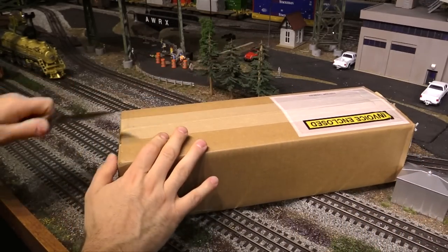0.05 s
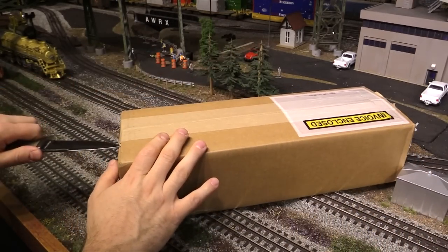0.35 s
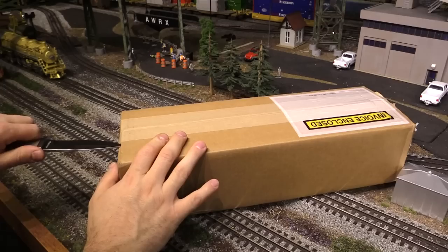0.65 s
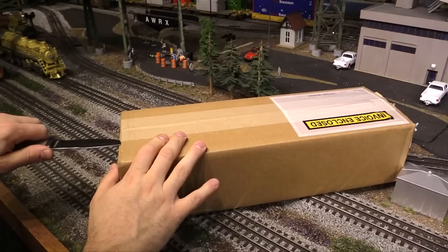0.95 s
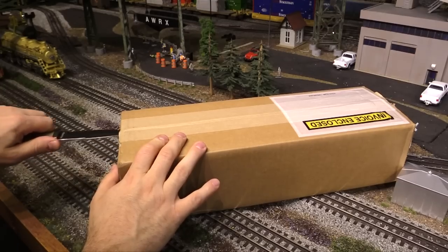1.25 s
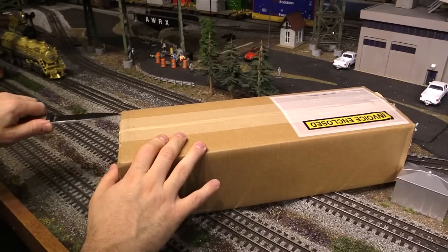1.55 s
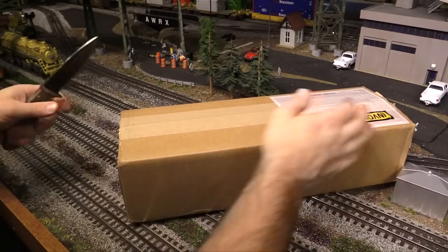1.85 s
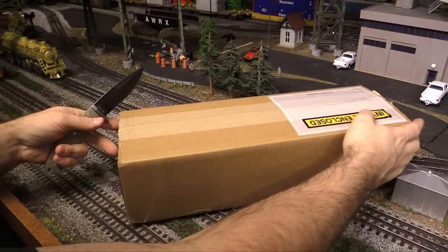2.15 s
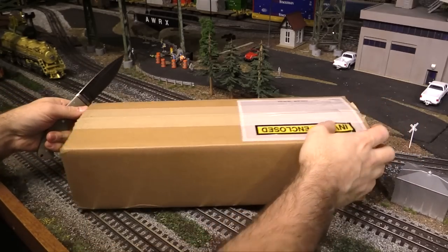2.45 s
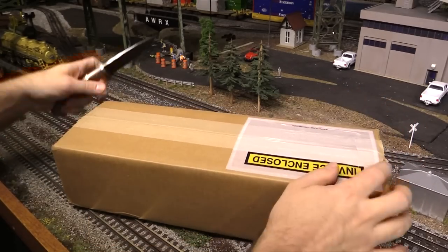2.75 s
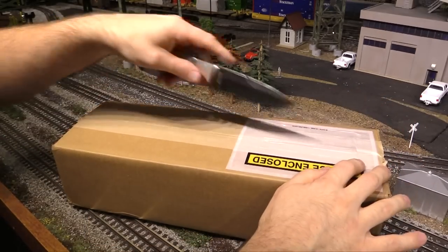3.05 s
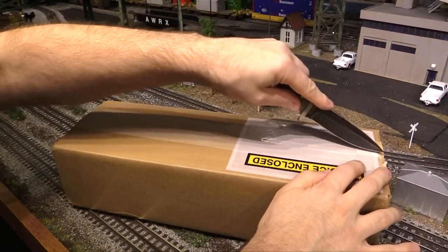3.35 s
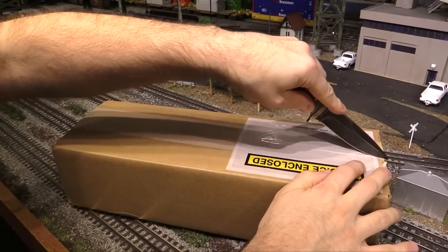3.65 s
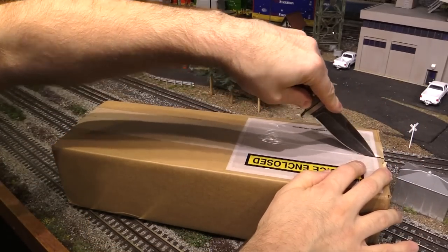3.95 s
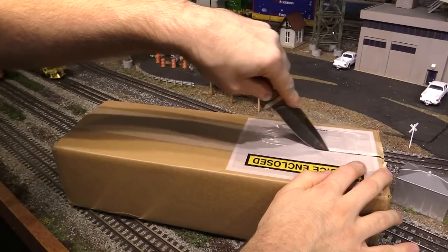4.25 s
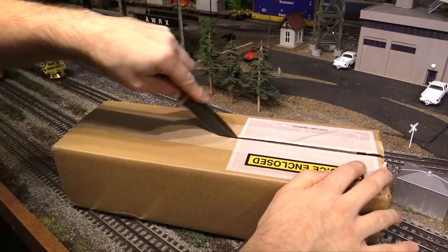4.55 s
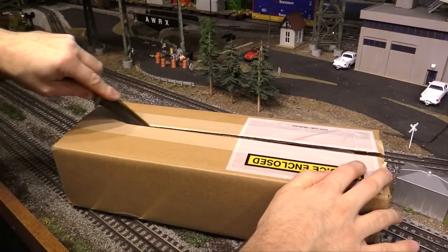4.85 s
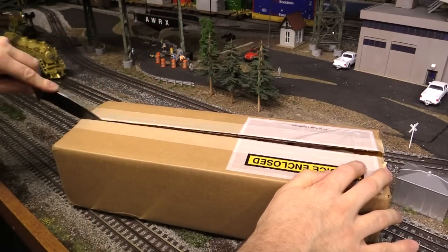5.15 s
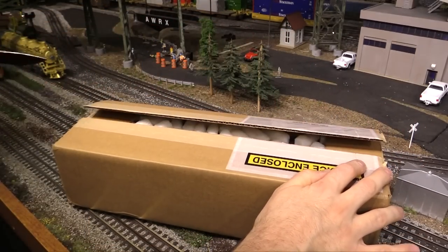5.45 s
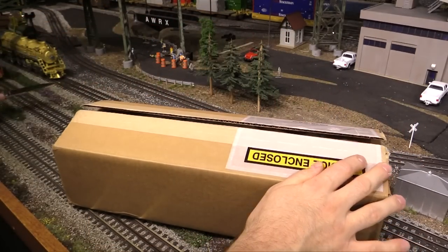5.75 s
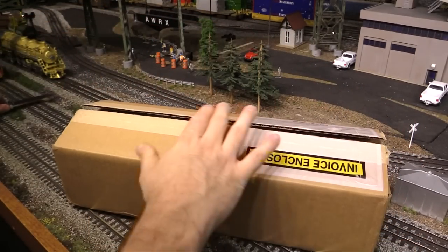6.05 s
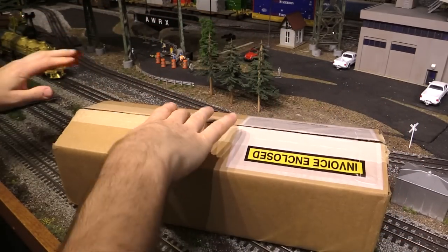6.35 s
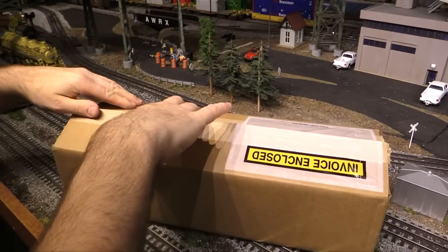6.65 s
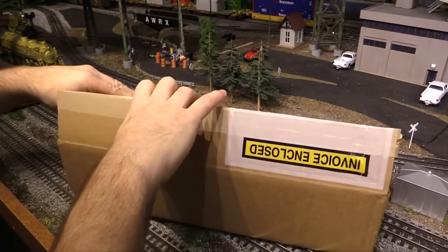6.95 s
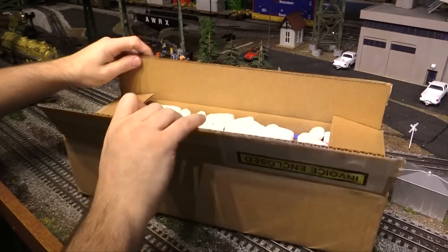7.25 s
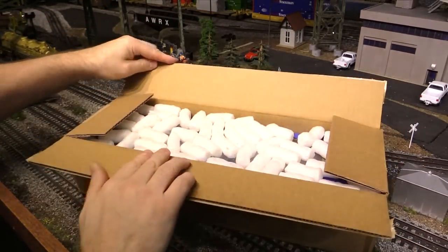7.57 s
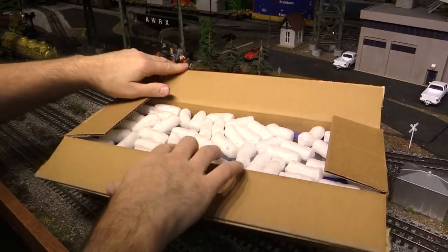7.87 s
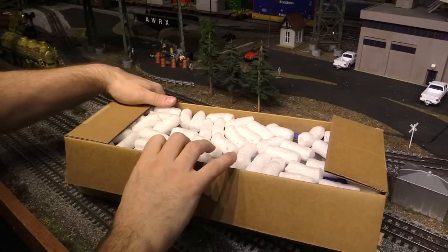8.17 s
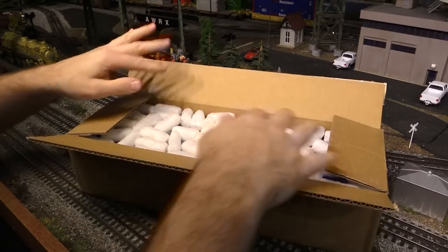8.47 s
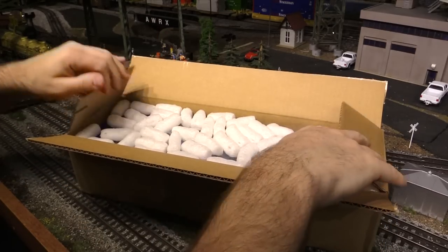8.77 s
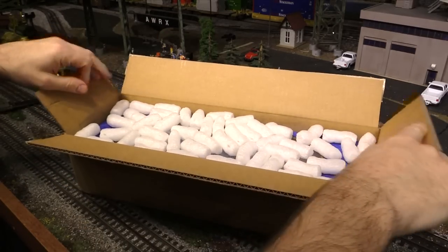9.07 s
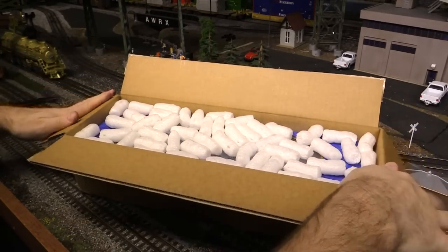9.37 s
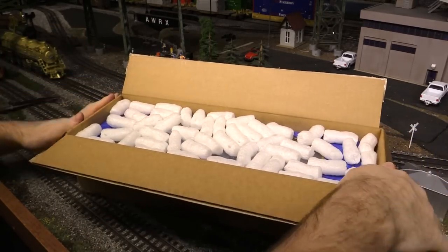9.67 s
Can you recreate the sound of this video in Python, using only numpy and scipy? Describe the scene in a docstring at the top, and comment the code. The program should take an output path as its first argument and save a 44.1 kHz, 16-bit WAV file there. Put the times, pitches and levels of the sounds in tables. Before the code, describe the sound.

Heard up close in a small room, a cardboard box thumps and a blade makes several quick cuts in its tape. After some shuffling and bumping on the table, the knife punctures the tape and drags along the seam with a surging rasp. A few sharp cardboard snaps follow, then uneven rubbing and tapping as the flaps are opened, with faint dry ticks from foam packing peanuts over a low hiss.

```python
"""A small room, close to a cardboard box: a knife slits the packing tape, first the end, then the seam.
Between the cuts the box is turned on a table; then the flaps snap, fold back and brush foam peanuts.
Each stroke is stick-slip friction: a stream of tiny slips that swells and fades with the speed and is
coloured by the hollow box. Blows excite the damped modes of its panels, which boom and ring.
Short reflections follow every sound, over a soft hiss."""
import sys
import numpy as np
from scipy import signal
from scipy.fft import rfft, irfft, next_fast_len
from scipy.io import wavfile
from scipy.ndimage import uniform_filter1d

SR = 44100
rng = np.random.default_rng(int(sys.argv[2]) if len(sys.argv) > 2 else 0)


def wav_record(signal):
    """Record a signal, one row per channel, as 16-bit PCM in the file named by sys.argv[1]."""
    frames = np.transpose(np.atleast_2d(signal))
    bounded = np.clip(frames, -1, 1)
    # unit amplitude maps onto the largest positive 16-bit level
    quanta = np.round(bounded * 32767).astype(np.int16)
    wavfile.write(sys.argv[1], SR, quanta)


N = 432929
HZ = np.fft.rfftfreq(8192, 1 / SR) + 1  # frequency grid of the filters
RING_S = np.arange(SR // 3) / SR  # time axis of one decay

# modes of the lid after a blow: freq_hz, level_db, t60_s
LID_MODES = [(460, -1.5, 0.13), (539.5, -3, 0.12), (571, 5.5, 0.054), (740, -4, 0.091), (785, -1.5, 0.05)]


def knife():
    """Stick-slip of a blade in tape: short sawing strokes at the end, then one long pull down the seam."""
    # short strokes: start_s, length_s, fastest_fraction, level_db, boom_re_level_db, hiss_re_level_db
    cuts = [(0.666, 0.35, 0.66, -36.5, 0, -13), (1.015, .17, 0.67, -28.5, 2.5, -10.5),
            (1.184, 0.12, 1, -29, -5.5, -4), (1.266, 0.2, 0.34, -25, 2, -10),
            (1.456, 0.15, 0.67, -26, -1.5, -5.5), (1.603, 0.076, 0.5, -30, -2, -11.5),
            (1.672, 0.115, 0.91, -41.5, 0.5, -7), (3.759, 0.15, 0.45, -41, -3, -13),
            (3.928, 0.2, 0.35, -32.5, -8, -11)]
    # the long pull, surging where the blade catches: time_s, force_db, boom_re_level_db, hiss_re_level_db
    seam = [(4.1, -41, -7, -11), (4.17, -35.5, 0, -9), (4.18, -28.5, -3, -15), (4.21, -31, 2, -10.5),
            (4.364, -21.5, -4.5, -14), (4.388, -14, -4.5, -11), (4.416, -20.5, -5.5, -12.5),
            (4.532, -28, -3, -11), (4.556, -23, -3, -13), (4.618, -19, -3, -10), (4.68, -22.5, -5, -7.5),
            (4.692, -17, -7, -11.5), (4.724, -24.5, -0.5, -9), (4.89, -17.5, -3, -11),
            (4.915, -16, -2, -10.5), (4.96, -20, -4.5, -13), (5.085, -28, -4, -6.5),
            (5.12, -20, -7.5, -10.5), (5.245, -31, 1, -7), (5.336, -40.5, -6, -5), (5.41, -58, -5, -7)]
    # friction spectra of the tape at the end and along the seam: freq_hz, density_db
    end_tape = [(50, -48), (145, -19), (185, -1.5), (400, -3), (600, -9), (740, -5), (1000, -8.5),
                (2900, -8.5), (3750, -16), (4100, -22), (5200, -25), (7200, -21), (12500, -32),
                (15500, -43)]
    seam_tape = [(50, -52), (100, -11.5), (146, -9), (178, -0.5), (290, 1.5), (480, -2), (680, -5),
                 (1100, -5), (2200, -3.5), (3700, -4.5), (4050, -13.5), (5400, -24), (6600, -18),
                 (12500, -29.5), (15500, -43)]
    out = np.zeros(N)
    for start, length, fastest, db, boom_db, hiss_db in cuts:
        level_db = stroke(length, fastest, db, db_per_decade=20)
        add(out, start, rub(level_db, boom_db, hiss_db, end_tape, slips_per_s=2500, spread_db=1.5,
                            scrape=0.61, grip_db=1.85, lid_share=0.73, boom_sway_db=-0.3, patchy_db=2.4))
    times, *controls = np.transpose(seam)
    pull_s = np.arange(times[0], times[-1], 1 / SR)
    force_db, boom_db, hiss_db = (np.interp(pull_s, times, control) for control in controls)
    add(out, times[0], rub(force_db + 1, boom_db, hiss_db, seam_tape, slips_per_s=1500, spread_db=0,
                           scrape=0.79, grip_db=1.24, lid_share=1.1, boom_sway_db=1, patchy_db=2.1))
    return amp(-2.5) * out


def flaps():
    """Friction at the folds: each flap scrapes as it swings, and brushes the foam."""
    # swings: start_s, length_s, fastest_fraction, level_db, boom_re_level_db, hiss_re_level_db
    folds = [(6.506, 0.17, 0.36, -49, 5, -29), (6.627, 0.33, 0.052, -45, -1, -11),
             (6.855, 0.17, 0.16, -39, -5, -9.5), (6.984, 0.22, 0.17, -37.5, 1, -11),
             (7.175, 0.2, 0.73, -34, -3.5, -7.5), (7.388, 0.16, 0.65, -36, -5, -7),
             (7.518, 0.17, 0.21, -32, -2.5, -10), (7.687, 0.12, 0.42, -34.5, -9, -13.5),
             (7.808, 0.23, 0.12, -46, -1, -10), (7.936, 0.3, 0.27, -38.5, -6.5, -10),
             (8.131, 0.14, 0.48, -39.5, -5, -19), (8.27, 0.1, 0.16, -40, 2, -14),
             (8.37, .15, 0.18, -38, -2, -9.5), (8.621, .15, 0.3, -38.5, -5.5, -14),
             (8.766, .16, 0.31, -40, -7, -14), (8.9, 0.16, 0.38, -36.5, -8.5, -6.5),
             (8.999, 0.22, 0.6, -35, -4, -11.5), (9.239, 0.036, 0.62, -29.5, -6, -7),
             (9.181, 0.21, 0.19, -31.5, -4, -7.5), (9.33, 0.25, 0.49, -33.5, -3, -13.5),
             (9.559, 0.068, 0.5, -33.5, 0, -30), (9.721, 0.19, 0.71, -29, -4, -16)]
    # friction spectrum of an open flap: freq_hz, density_db
    open_flap = [(29, -57), (50, -26), (165, -14), (288, -1), (413, -8), (466, -3.5), (668, -12.5),
                 (790, -10.5), (1410, -8), (2300, -11.5), (3200, -10), (3750, -15), (4100, -18.5),
                 (5260, -21.5), (5930, -14.5), (8710, -19.5), (12200, -24), (15500, -35)]
    out = np.zeros(N)
    for start, length, fastest, db, boom_db, hiss_db in folds:
        level_db = stroke(length, fastest, db, db_per_decade=15)
        add(out, start, rub(level_db, boom_db, hiss_db, open_flap, slips_per_s=450, spread_db=0.86,
                            scrape=1, grip_db=1.5, lid_share=0.18, boom_sway_db=2.7, patchy_db=2))
        add(out, start, peanuts(level_db - 21, ticks_per_s=60, spread_db=3))
    return amp(-2) * out


def sliding():
    """Sliding friction: a hand moves over the card, or the box turns on the table."""
    # slides: start_s, length_s, fastest_fraction, level_db, boom_re_level_db, hiss_re_level_db
    slides = [(0.033, 0.23, 0.078, -53, -27, 2.5), (2.168, 0.26, 0.8, -37, -4.5, -9.5),
              (2.382, 0.24, 0.64, -36.5, 4, -8), (2.561, 0.29, 0.36, -32.5, 5, -13.5),
              (2.777, 0.25, 0.41, -48, 6, -4.5), (3.031, 0.37, 0.09, -50, -7, -6.5),
              (3.53, .24, 0.83, -57, 1, -7), (5.362, 0.13, 0.34, -57, 15, -19),
              (5.68, 0.24, 0.85, -49.5, -2.5, -7.5)]
    # friction spectrum of cardboard: freq_hz, density_db
    cardboard = [(50, -38), (130, -25), (200, 2.5), (300, 2), (620, -5.5), (780, -2.5), (1180, -6),
                 (1900, -1.5), (3650, -6.5), (4050, -19), (5400, -28), (7500, -24.5), (12500, -35.5),
                 (15500, -46)]
    out = np.zeros(N)
    for start, length, fastest, db, boom_db, hiss_db in slides:
        level_db = stroke(length, fastest, db, db_per_decade=15)
        add(out, start, rub(level_db, boom_db, hiss_db, cardboard, slips_per_s=2500, spread_db=-0.5,
                            scrape=1, grip_db=3.5, lid_share=0.35, boom_sway_db=1, patchy_db=2))
    return amp(-3) * out


def stroke(length_s, fastest, db, db_per_decade):
    """Friction noise follows a power of speed: the level in dB of a movement that speeds up and slows."""
    progress = np.arange(0, length_s, 1 / SR) / length_s
    phase = np.interp(progress, [0, np.clip(fastest, 0.05, 0.95), 1], [0, 0.5, 1])
    speed = np.sin(np.pi * phase) + 0.036
    return db + db_per_decade * np.log10(speed)


def rub(level_db, boom_db, hiss_db, spectrum, slips_per_s, spread_db, scrape, grip_db, lid_share,
        boom_sway_db, patchy_db):
    """Source and filter: tiny slips over a smooth scrape drive the lid as the grip comes and goes."""
    size = len(level_db)
    slips = (rng.random(size) < slips_per_s / SR) * rng.choice([-1, 1], size)
    slips = slips * amp(spread_db * np.minimum(rng.exponential(1, size), 4))
    friction = evened(slips) + scrape * rng.standard_normal(size)
    grip = amp(grip_db * wander(size, rate_hz=64))
    sound = colour(friction * grip, read(spectrum, HZ) + lid_share * lid_resonance_db())
    sound = moving_contact(sound, patchy_db)
    # the boom of the panels, the rasp and the hiss of the edge, parted without phase shift
    boom_hz, hiss_hz = 650, 4300
    padded = next_fast_len(2 * size)
    bins, hz = rfft(sound, padded), np.fft.rfftfreq(padded, 1 / SR)
    boom = 1 / (1 + (hz / boom_hz) ** 6)
    hiss = 1 - 1 / (1 + (hz / hiss_hz) ** 12)
    rasp = 1 - boom - hiss
    parts = (boom, boom_db + boom_sway_db * wander(size, rate_hz=34)), (rasp, 0), (hiss, hiss_db)
    out = sum(evened(irfft(bins * share, padded)[:size]) * amp(level_db + db) for share, db in parts)
    return out * signal.windows.tukey(size, 0.0033 * SR / size)


def lid_resonance_db():
    """Forced resonance: the lid's gain on the HZ grid is a sum of bell-shaped peaks."""
    # resonances of the driven lid: centre_hz, width_hz, gain_db
    peaks = [(171, 11, 4.5), (217.5, 32, 4.5), (464, 40, 6), (801, 50, 8.5), (1107, 140, 7.5),
             (1370, 160, 5), (1880, 49, 6), (2180, 45, 1.5), (2410, 100, -0.5), (3140, 620, 2.5)]
    return sum(db / (1 + (2 * (HZ - hz) / width) ** 2) for hz, width, db in peaks)


def moving_contact(x, depth_db):
    """Excitation depends on position: as the contact travels, patches of resonance swell and fade."""
    spectra = signal.stft(x, nperseg=1024)[2]
    patches = uniform_filter1d(rng.standard_normal(spectra.shape), size=7, axis=0)  # across frequency
    patches = uniform_filter1d(patches, size=9, axis=1)  # across time
    return signal.istft(spectra * amp(depth_db * evened(patches)), nperseg=1024)[1][:len(x)]


def knocks():
    """Impact excitation: a struck panel cracks, swings a few times and leaves box and lid ringing."""
    # blows on the box: start_s, thump_db, thump_hz, lid_ring_db, crack_db, crack_hz
    blows = [(0.342, -18.5, 237, -22, -31.5, 745), (.423, -37, 228, -40, -61, 720),
             (1.564, -20, 230, -27, -19.5, 1950), (2.18, -45, 277, -41, -41, 1700),
             (2.245, -29.5, 483, -42, -34.5, 2020), (2.293, -28, 318, -31.5, -37, 1340),
             (2.608, -41, 293, -25.5, -32, 1558), (2.6989, -30, 296, -27, -23, 840),
             (2.793, -23.5, 182, -28.5, -34.5, 910), (2.823, -25.5, 197, -38, -56, 960),
             (3.005, -22.5, 182, -38, -44, 1180), (3.245, -42.5, 280, -51, -46.5, 1630),
             (3.508, -26.5, 280, -36.5, -33.5, 1010), (4.024, -21.5, 280, -16, -19.5, 1500),
             (5.257, -16, 298, -19.5, -20.5, 820), (5.354, -18.5, 298, -30, -26, 1030),
             (5.563, -47.5, 290, -63, -60, 1170), (7.388, -24, 320, -31.5, -23.5, 1850),
             (7.475, -32, 313, -58, -47, 1200), (8.016, -38, 278, -46, -61, 1200),
             (8.283, -28.5, 260, -28.5, -25.5, 830), (8.462, -36, 317, -36, -32.5, 1060),
             (9.291, -33, 158, -35, -38, 1100)]
    # modes of the hollow box: freq_hz, level_db, t60_s
    box_modes = [(89, 9, 0.13), (172, 6, 0.28), (208.3, 3.5, 0.34), (276, -5, 0.14)]
    out = np.zeros(N)
    for start, thump_db, thump_hz, ring_db, crack_db, crack_hz in blows:
        envelope = amp(-60 * RING_S / 0.017) * (1 - np.exp(-RING_S / 0.0035))
        panel = struck(np.sin(2 * np.pi * thump_hz * RING_S) * envelope)
        shudder = struck(colour(burst(t60=0.04, lead=0.069), hump(thump_hz, octaves=0.35)))
        thump = struck(panel + 0.23 * modes(box_modes) + 0.73 * shudder)
        body = amp(thump_db) * thump + amp(ring_db) * modes(LID_MODES)
        # keep the blow's body between about 110 Hz and 1.5 kHz, without deep bass or treble
        body = band(body, [112, 1500], "bandpass", order=3)
        edge = crack(crack_hz, t60=0.056, octaves=1.2, lead=0.55) + amp(-24.5) * bright_edge(t60=0.04)
        add(out, start, body + amp(crack_db) * edge)
    return out


def snaps():
    """Sudden release: card buckles or is slapped, or a shred of tape parts, and the flap pings."""
    # snaps and slaps of card and tape: start_s, level_db, pitch_hz, t60_s, edge_db
    breaks = [(1.93, -43, 2120, 0.0083, -70), (2.061, -37.5, 2900, 0.0056, -58),
              (2.2452, -41, 1910, 0.046, -47), (2.499, -31, 1960, 0.062, -50),
              (2.612, -31, 1920, 0.039, -54), (2.653, -31, 820, 0.069, -56), (2.996, -39, 2210, 0.064, -49),
              (3.918, -41.5, 750, 0.04, -70), (4.1775, -34.5, 1470, 0.06, -45),
              (5.354, -31.5, 2980, 0.016, -41), (6.0607, -17, 885, 0.11, -43),
              (6.216, -20, 1890, 0.093, -33), (6.239, -26, 1240, 0.1, -43), (6.344, -49, 1700, 0.12, -66),
              (6.878, -37, 1120, 0.06, -53), (7.3242, -22, 1660, 0.024, -54),
              (7.894, -39.5, 1550, 0.04, -56), (9.037, -35, 2280, 0.11, -46),
              (9.2168, -30, 2770, 0.018, -30), (9.643, -40, 1580, 0.15, -57), (9.685, -36, 1360, 0.23, -51)]
    # modes of a stiff flap: freq_hz, level_db, t60_s
    flap_modes = [(705, -1.5, 0.1), (904, 0.5, 0.046), (1352, -3, 0.051), (2060, -11, 0.03),
                  (2410, -2, 0.032), (3000, -6, 0.022)]
    # response of the air in the box: freq_hz, density_db
    cavity = [(80, -15), (165, 2), (520, 0), (1200, -64), (4000, -92)]
    out = np.zeros(N)
    for start, db, hz, t60, edge_db in breaks:
        # a longer break is broader, and stirs the lid and the air in the box more
        rasp = crack(hz, t60, octaves=0.5 + 6.3 * t60, lead=0.66)
        rasp = band(rasp, 0.32 * hz, "high", order=2)
        rasp = struck(colour(rasp, min(3 * t60, 1) * lid_resonance_db()))
        ping = struck(colour(modes(flap_modes), hump(hz, octaves=0.57)))
        ping_db = 6.5 + 0.65 * db  # harder snaps ring more
        hollow = struck(colour(burst(t60=0.38, lead=0.11), read(cavity, HZ)))
        box_ring = t60 * (1.75 * hollow + 1.3 * modes(LID_MODES))
        body = band(rasp + amp(ping_db) * ping + box_ring, 126, "high", order=2)
        add(out, start, amp(db) * body + amp(edge_db) * bright_edge(t60=0.65 * t60))
    return out


def burst(t60, lead):
    """Fracture: one sharp impulse of height lead, then an exponentially dying crackle of fibres."""
    crackle = rng.standard_normal(len(RING_S)) * amp(-60 * RING_S / max(t60, 0.002))
    crackle /= np.linalg.norm(crackle)
    crackle[0] += lead
    return crackle


def crack(hz, t60, octaves, lead):
    """Band-limited radiation: cardboard sounds a break around one pitch, with little above 4 kHz."""
    sound = colour(burst(t60, lead), hump(hz, octaves))
    sound = band(sound, min(3.4 * hz, 3100), "low", order=7)
    return struck(band(sound, 0.045 * hz, "high", order=2))


def bright_edge(t60):
    """An abrupt onset is rich in treble: the bright edge of a blow or break."""
    sound = colour(burst(t60, lead=0.63), hump(4700, octaves=1))
    sound = band(sound, 2500, "high", order=2)
    return struck(band(sound, 9200, "low", order=3))


def modes(table):
    """Free vibration: the sum of an object's exponentially damped sines."""
    return struck(sum(amp(db - 60 * RING_S / t60) * np.sin(2 * np.pi * hz * RING_S)
                      for hz, db, t60 in table))


def groans():
    """Friction-driven resonance: a panel hums or an edge squeaks in a brief, wavering swell."""
    # hums and squeaks: start_s, end_s, pitch_hz, level_db
    swells = [(1.036, 1.066, 299, -29.5), (1.32, 1.372, 200, -27.5), (4.97, 5.22, 464.5, -30.5),
              (9.235, 9.274, 2036, -30.5)]
    out = np.zeros(N)
    for start, end, hz, db in swells:
        size = int((end - start) * SR)
        cycles = np.cumsum(hz * np.exp(0.09 * wander(size, rate_hz=0.49 * hz))) / SR
        swell = signal.windows.tukey(size, 0.8) * amp(1.7 * wander(size, rate_hz=107))
        add(out, start, amp(db) * evened(swell * np.sin(2 * np.pi * cycles)))
    return out


def ticks():
    """Isolated transients: parting tape and foam give single dry ticks, and the knife blade one brief ting."""
    # ticks of tape and foam, and one ting of the blade: start_s, level_db, pitch_hz
    events = [(1.461, -47, 5500), (1.563, -29, 7100), (1.661, -40.5, 5400), (4.0234, -29, 6150),
              (4.262, -36.5, 4250), (4.616, -33, 7100), (5.258, -36.5, 6500), (5.353, -37.5, 3670),
              (6.963, -46, 3730), (7.024, -47, 8000), (7.066, -46, 4500), (7.388, -27.5, 7500),
              (7.489, -47, 7500), (8.082, -35.5, 5370), (8.089, -37.5, 6500), (8.839, -43, 4800),
              (8.862, -45, 4600), (8.88, -38.5, 7160), (8.905, -49, 5500)]
    out = np.zeros(N)
    for start, db, hz in events:
        add(out, start, amp(db) * dry_tick(hz))
    return out


def peanuts(level_db, ticks_per_s, spread_db):
    """Shot noise: foam pieces tick at random against a flap, louder the faster it goes."""
    size = len(level_db)
    contacts = rng.random(size) < ticks_per_s / SR
    strength = amp(spread_db * np.minimum(rng.exponential(1, size), 3))
    return signal.oaconvolve(contacts * strength * amp(level_db), dry_tick(hz=7040))[:size]


def dry_tick(hz):
    """Heavy damping: a short burst through a broad resonance just below hz."""
    sound = colour(burst(t60=0.041, lead=0.87), hump(0.91 * hz, octaves=0.96))
    return struck(band(sound, 10800, "low", order=3))


def creaks():
    """Stick-slip in a fold: an uneven train of slips, each ringing a narrow, high resonance."""
    # runs of slips: start_s, end_s, slips_per_s, level_db
    runs = [(9.545, 9.62, 180, -52), (9.675, 9.691, 190, -47)]
    out = np.zeros(N)
    for start, end, slips_per_s, db in runs:
        size = int((end - start) * SR)
        cycles = np.cumsum(slips_per_s * np.exp(0.46 * wander(size, rate_hz=130))) / SR
        slips = np.diff(np.floor(cycles), prepend=-1)
        add(out, start, amp(db) * evened(colour(slips, hump(7600, octaves=0.098))))
    return out


def room(x, wet_db, early_db):
    """Reverberation: early reflections from table and walls, and a tail that dies faster in the treble."""
    # reverberation times: freq_hz, t60_s
    decay_times = [(150, 0.2), (400, 0.27), (1000, 0.2), (3000, 0.18), (8000, 0.18), (15000, 0.18)]
    hz, t, spectra = signal.stft(rng.standard_normal(len(RING_S)), SR, nperseg=256)
    decay = amp(-60 * t / read(decay_times, hz)[:, None])
    tail = signal.istft(spectra * decay, SR, nperseg=256)[1][:len(RING_S)]
    tail *= np.clip((RING_S - 0.005) / 0.01, 0, 1)
    response = amp(wet_db) * tail / np.linalg.norm(tail)
    delays_s = rng.uniform(0.002, 0.014, size=8)
    response[(delays_s * SR).astype(int)] += amp(early_db) * rng.choice([-1, 1], size=8)
    return x + signal.oaconvolve(x, response)[:N]


def air():
    """Noise floor: a soft broadband hiss that drifts in level, lowest after the long cut."""
    # spectrum of the hiss: freq_hz, density_db
    spectrum = [(25, -12.5), (129, 5.5), (400, -2), (826, -5), (1660, -10), (1950, -6.5), (5140, -17.5),
                (9050, -20.5), (15500, -32.5)]
    # drift of the hiss: time_s, level_db
    drift = [(0, -51.5), (2, -53), (3.9, -48.5), (5.4, -54), (6.05, -57.5), (6.5, -53), (9.8, -50)]
    hiss = evened(colour(rng.standard_normal(N), read(spectrum, HZ)))
    return hiss * amp(np.interp(np.arange(N) / SR, *np.transpose(drift)))


def colour(x, db):
    """Minimum-phase filtering: a causal response with the gain db on the HZ grid."""
    log_gain = np.log(amp(np.maximum(db, db.max() - 100)))
    mirrored = np.r_[log_gain, log_gain[-2:0:-1]]
    response = np.exp(np.conj(signal.hilbert(mirrored)))
    taps = np.fft.ifft(response).real[:len(HZ)]
    return signal.oaconvolve(x, taps)[:len(x)]


def band(x, hz, kind, order):
    """Maximally flat filtering with its cutoff at hz."""
    sections = signal.butter(order, np.clip(hz, 10, SR / 2 - 100), kind, fs=SR, output="sos")
    return signal.sosfilt(sections, x)


def hump(hz, octaves):
    """Resonance curve in dB, 6 dB down at the given octaves either side of hz."""
    return -20 * np.log10(1 + (np.log2(HZ / hz) / octaves) ** 2)


def read(points, hz):
    """Interpolation of a table on a log-frequency axis."""
    freq_hz, value = np.transpose(points)
    return np.interp(np.log(hz + 1), np.log(freq_hz), value)


def wander(size, rate_hz):
    """Random modulation: straight lines between normal draws, rate_hz of them a second."""
    return np.interp(np.arange(size) * rate_hz / SR, np.arange(size), rng.standard_normal(size))


def amp(db):
    """Amplitude ratio of a level in decibels."""
    return 10 ** (np.asarray(db) / 20)


def evened(x):
    """Normalisation to rms 1."""
    return x / np.sqrt(np.mean(x ** 2) + 1e-20)


def struck(x):
    """Normalisation of a hit to rms 1 over its first 20 ms."""
    return x / np.sqrt(np.mean(x[:SR // 50] ** 2) + 1e-20)


def add(mix, start_s, sound):
    """Superposition: a sound joins the mix at start_s."""
    part = mix[max(round(start_s * SR), 0):][:len(sound)]
    part += sound[:len(part)]


def scene():
    """Superposition in one channel: strokes and transients reverberate in the room, over the hiss."""
    rubs = knife() + sliding() + flaps()
    transients = knocks() + snaps() + ticks() + creaks() + groans()
    mix = room(rubs, wet_db=-14.5, early_db=-22) + room(transients, wet_db=-14, early_db=-24)
    return (mix + air())[None]


def record(dry):
    """Band limiting and soft saturation: the microphone sheds deep bass, peak height and top treble."""
    bass_hz, top_hz, ceiling = 75, 15850, 0.88
    thinned = band(dry, bass_hz, "high", order=1)
    rounded = thinned / (1 + (abs(thinned) / ceiling) ** 8) ** (1 / 8)
    lowpass = signal.firwin(511, top_hz, window=("kaiser", 9), fs=SR)
    return signal.oaconvolve(rounded, lowpass[None], "same")


dry = scene()
out = record(dry)
wav_record(out)
```